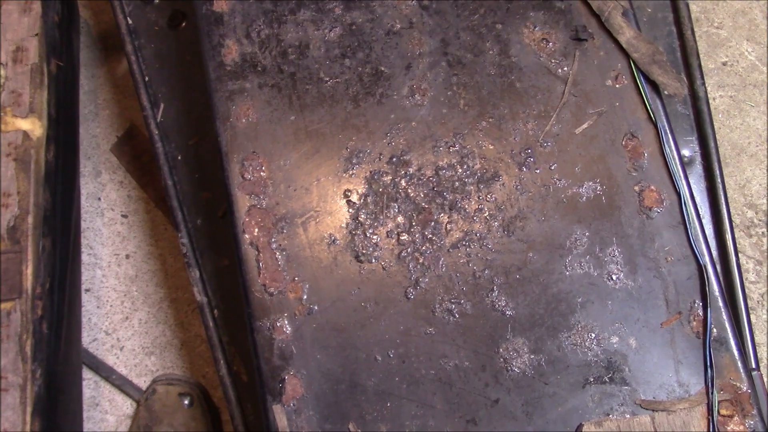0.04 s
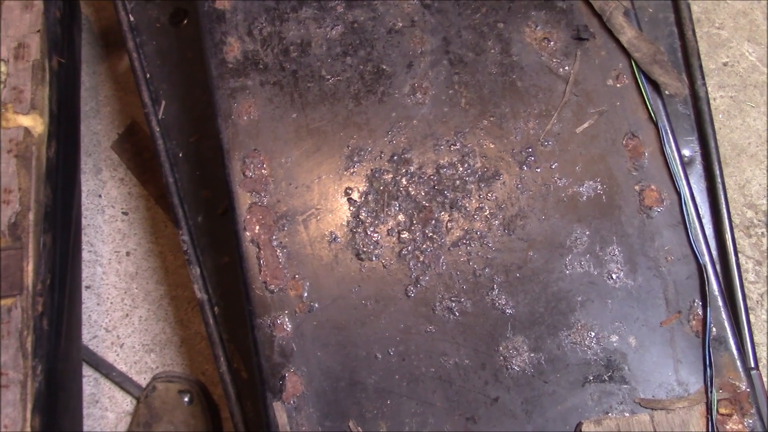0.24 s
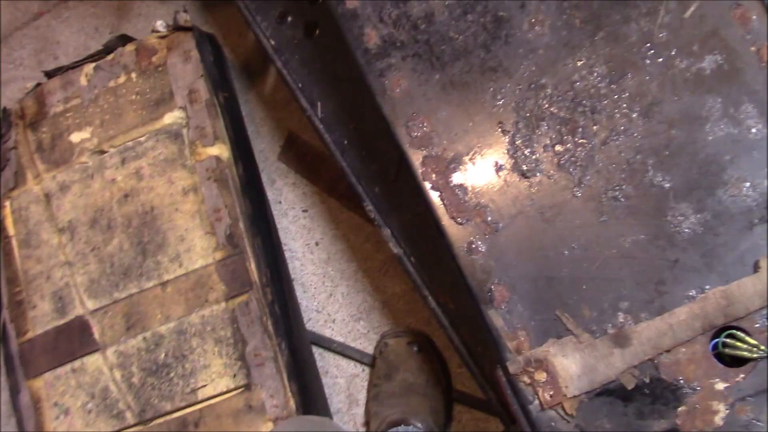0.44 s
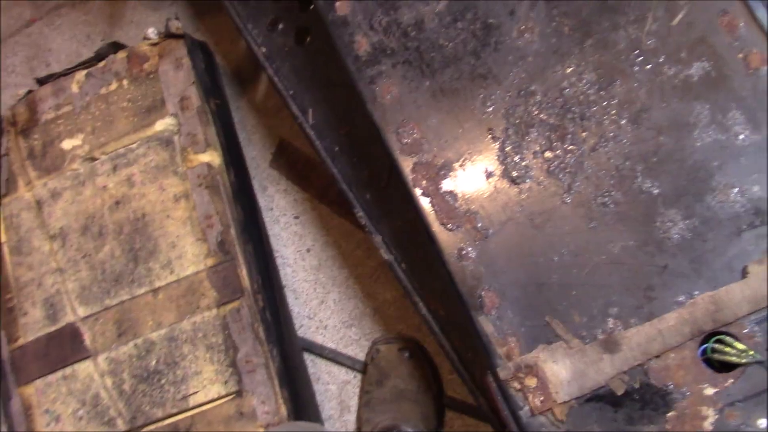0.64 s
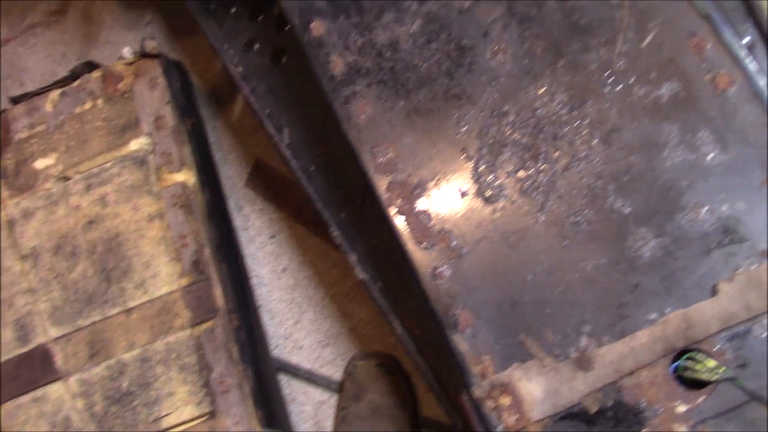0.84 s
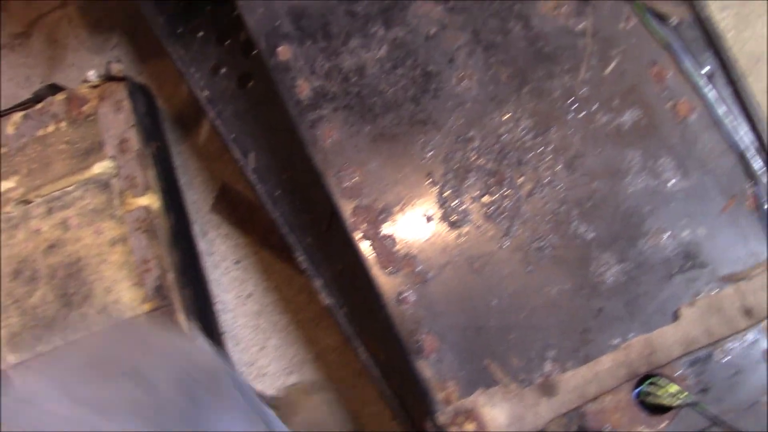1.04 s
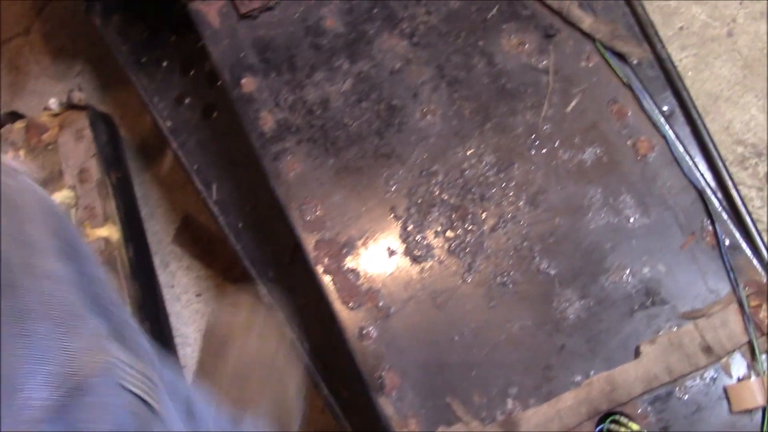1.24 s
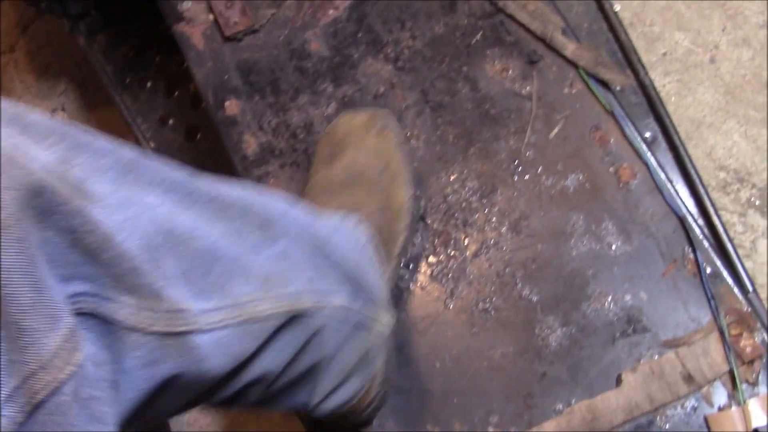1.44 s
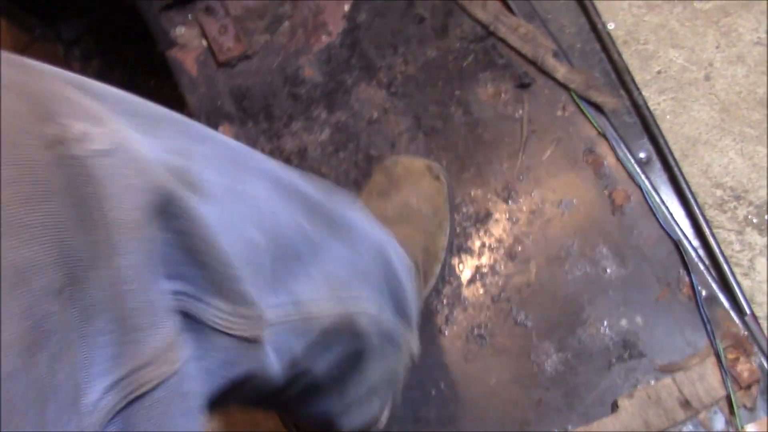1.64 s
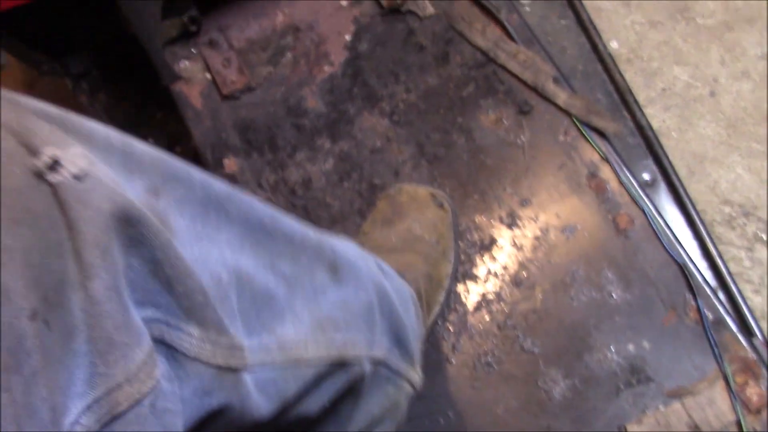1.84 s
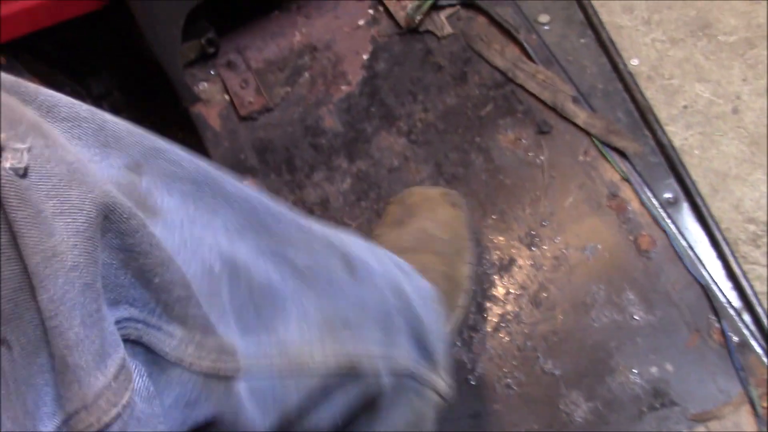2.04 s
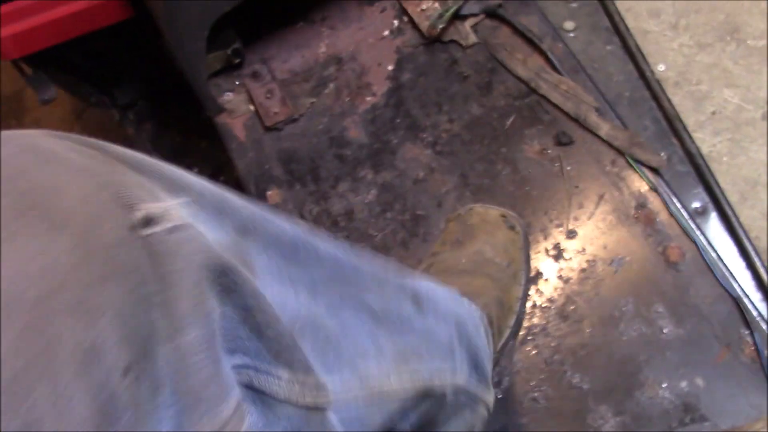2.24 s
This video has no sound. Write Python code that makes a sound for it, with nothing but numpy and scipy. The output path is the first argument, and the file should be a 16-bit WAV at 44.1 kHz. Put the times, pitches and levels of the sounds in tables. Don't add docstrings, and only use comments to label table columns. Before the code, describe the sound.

Two loud hollow metal booms as a boot stomps a loose rusty steel panel, flakes rattling.

```python
import sys
import numpy as np
from scipy import signal
from scipy.fft import rfft, irfft, next_fast_len
from scipy.io import wavfile

SR = 44100
rng = np.random.default_rng(int(sys.argv[2]) if len(sys.argv) > 2 else 0)


def unload_audio(sound):
    columns = np.transpose(np.atleast_2d(sound))
    steps = np.round(np.clip(columns, -1, 1) * 32767)
    wavfile.write(sys.argv[1], SR, steps.astype(np.int16))


def invert_db(level):
    return 10 ** (np.asarray(level, dtype=float) / 20)


N = 100503


def rms_one(x):
    return x / np.sqrt(np.mean(x ** 2) + 1e-20)


def in_time(rows):
    s, db = np.transpose(rows)
    return invert_db(np.interp(np.arange(N) / SR, s, db, right=-140))


def at_hz(points, hz):
    table_hz, value = np.transpose(points)
    return np.interp(np.log(hz), np.log(table_hz), value)


def drift(rate_hz):
    r = np.exp(-2 * np.pi * rate_hz * 40 / SR)
    slow = signal.lfilter([1], [1, -2 * r, r * r], rng.standard_normal(N // 40 + 2002))[2000:]
    return np.interp(np.arange(N) / 40, np.arange(len(slow)), rms_one(slow))


def banded(spectrum, patchy_db, white):
    shared_flicker = 0.6
    out, together = 0, drift(11.0)
    edges = 25 * 2 ** np.arange(0, 9.6, .5)
    for k, (low, high) in enumerate(zip(edges, edges[1:])):
        flicker = shared_flicker * together + drift(9.6)
        gain = invert_db(at_hz(spectrum, np.sqrt(low * high)) + patchy_db * flicker)
        if spectrum[0][0] <= high and low <= spectrum[-1][0]:
            band = signal.butter(2, [low, high], "band", fs=SR, output="sos")
            out = out + gain * signal.sosfilt(band, white[k % 2])
    return rms_one(out)


def add(out, s, sound):
    i = int(s * SR)
    out[i:i + len(sound)] += sound[:len(out) - i]


def panel():
    # start_s, strength_db, hardness_hz, favoured_hz
    contacts = [(0.951, -48, 350, 300), (1.5495, -3.5, 3300, 670), (1.585, -15, 1570, 496),
                (1.603, -9.5, 1530, 830), (1.6308, -18.5, 3970, 1500), (1.705, -57, 1030, 400),
                (1.866, -40, 4860, 1000), (1.89, -36.5, 1520, 403), (1.907, -30, 900, 363),
                (1.965, -58, 800, 300), (2.009, -40.5, 807, 248), (2.064, 2, 1870, 540),
                (2.101, -9, 2630, 576), (2.13, -9.5, 490, 397), (2.1535, -15, 6140, 2720),
                (2.19, -23, 4980, 300), (2.2411, -25, 6000, 2520), (2.26, -23, 794, 550)]
    # pitch_hz, level_db, t60_s
    strong_modes = [(174.35, -11, 0.51), (259.3, -3.5, 0.22), (288, -9, 0.15), (305, -2.5, 0.13),
                    (356, -8.5, 0.1), (393, -20, 0.13), (471, -2.5, 0.14), (505.7, -6, 0.13),
                    (560.5, -7.5, 0.07), (646.3, -24.5, 0.14), (860.8, -8, 0.19), (950, -21, 0.27),
                    (1054, -15.5, 0.18), (729, -36, 0.96)]
    # pitch_hz, level_db
    dense_levels = [(110, -25), (200, -17.5), (400, -18.5), (1000, -16), (2000, -17.5), (4000, -25),
                    (8000, -23), (15000, -78)]
    # pitch_hz, t60_s
    dense_t60 = [(110, 0.37), (400, 0.24), (1300, 0.15), (5000, 0.091), (15000, 0.059)]
    mode_db, scatter_db, rise_s = -13, 1.5, 0.00031
    favour_db, favour_octaves = 4.5, 0.83
    push_db, push_s = -14.5, 0.0091
    crack_db, crack_s = -10.5, 0.003

    t, out = np.arange(2 * SR // 5) / SR, np.zeros(N)
    dense_hz = np.sort(110 * (15500 / 110) ** rng.random(360) ** .8)
    dense_modes = [dense_hz, at_hz(dense_levels, dense_hz), at_hz(dense_t60, dense_hz)]
    hz, db, t60 = np.hstack([np.transpose(strong_modes), dense_modes])
    decay = invert_db(db[:, None] - 60 * t / t60[:, None])
    rings = np.sin(2 * np.pi * hz[:, None] * t) * decay * (1 - np.exp(-t / rise_s))
    push = invert_db(push_db) * t / push_s * np.exp(1 - t / push_s)
    for s, hit_db, hard_hz, favour_hz in contacts:
        size, side = rng.standard_normal((2, len(hz)))
        favour = favour_db * np.exp(-(np.log2(hz / favour_hz) / favour_octaves) ** 2)
        polarity = np.where(side > -.5, 1, -1)
        softness = 1 / (1 + (hz / hard_hz) ** 2)
        share = invert_db(mode_db + scatter_db * size + favour) * polarity * softness
        soft = signal.butter(3, min(hard_hz, .45 * SR), fs=SR, output="sos")
        burst = rng.standard_normal(len(t)) * np.exp(-t / crack_s)
        crack = invert_db(crack_db) * signal.sosfilt(soft, burst)
        add(out, s, invert_db(hit_db) * (share @ rings + push + crack))
    return out


def blooms():
    # start_s, peak_db, pitch_hz,
    # swell_s
    bloom_events = [(0.14, -66, 1487, .04), (0.27, -60, 1523, 0.026), (1, -51, 244, .012),
                    (1.549, -18, 305, 0.0076), (1.55, -31.5, 496, .008), (1.551, -32, 650, 0.005),
                    (1.552, -30, 147, 0.0088), (1.553, -20.5, 1292, 0.0085), (1.57, -22, 720, 0.0092),
                    (1.577, -14, 256.4, 0.018), (1.585, -24.5, 1150, 0.011), (1.59, -18.5, 357, 0.013),
                    (1.592, -19, 855, 0.0098), (1.6, -45, 108, 0.056), (1.61, -28, 179.5, 0.025),
                    (1.625, -26, 380.4, 0.011), (1.65, -24.5, 266, 0.016), (1.655, -25.5, 340, 0.01),
                    (1.67, -49, 772, 0.0097), (1.69, -50.5, 714, 0.053), (1.7, -49, 516, 0.014),
                    (1.735, -39, 281, 0.014), (1.87, -44.5, 168.6, 0.027), (1.9, -32, 344, 0.012),
                    (1.96, -41.5, 289, 0.017), (1.97, -50, 164, 0.023), (2.064, -13.5, 476, 0.0092),
                    (2.0642, -9.5, 241, 0.0092), (2.0644, -17.5, 890, 0.0061),
                    (2.0646, -15.5, 153.3, 0.015), (2.066, -13.5, 576.3, 0.0087), (2.087, -22, 642, 0.012),
                    (2.086, -25.5, 1085, 0.01), (2.095, -30.5, 1200, 0.012), (2.105, -21.5, 513, 0.012),
                    (2.115, -13.5, 257, .016), (2.14, -20, 175.2, 0.024), (2.145, -25, 937, 0.0067),
                    (2.149, -15.5, 283.7, .013), (2.187, -21, 255.2, 0.018), (2.19, -39.5, 649, .015),
                    (2.215, -34.5, 485, 0.012), (2.23, -39, 180, 0.022), (2.245, -29, 271, 0.014),
                    (2.245, -34.5, 536, 0.0099)]
    twin_ratio, twin_db = 1.07, -10.5
    t, out = np.arange(SR // 3) / SR, np.zeros(N)
    for s, db, hz, swell_s in bloom_events:
        main = np.sin(2 * np.pi * hz * t)
        twin = invert_db(twin_db) * np.sin(2 * np.pi * hz * twin_ratio * t)
        swell = invert_db(db) * t / swell_s * np.exp(1 - t / swell_s)
        add(out, s, swell * (main + twin))
    return out


def flakes(motion):
    # pitch_hz, density_db (per Hz)
    flake_colour = [(500, 7.5), (1500, 5.5), (3000, -3), (5000, -16), (6800, -16.5), (10000, -31),
                    (13000, -27), (15500, -41)]
    shake_db, follow_s, shake_power = -16, 0.007, 0.84
    r = np.exp(-1 / (follow_s * SR))
    shake = signal.lfilter([1 - r], [1, -r], motion ** 2) ** (shake_power / 2)
    return invert_db(shake_db) * shake * banded(flake_colour, 1.0, rng.standard_normal((2, N)))


def ticks():
    # start_s, peak_db, ring_hz, t60_s
    tick_events = [(1.5495, -36, 7000, .009), (1.588, -57, 12200, .031), (1.593, -56.5, 10700, .035),
                   (1.596, -46, 4100, .03), (1.614, -58, 12000, .007), (1.632, -51, 6800, .044),
                   (1.633, -58, 12250, .035), (1.637, -62, 13300, .025), (1.6885, -63, 11500, .009),
                   (1.752, -63, 10000, .008), (1.8106, -51, 2080, .011), (1.82, -60, 6500, .008),
                   (1.845, -62, 8000, .007), (1.868, -56, 3440, .017), (1.869, -57, 7000, .017),
                   (1.941, -59, 5460, .01), (1.9725, -55, 10600, .03), (1.9745, -61, 12800, .016),
                   (2.0174, -46, 6400, .008), (2.0875, -47, 10700, .07), (2.0885, -54, 12500, .045),
                   (2.104, -46, 6800, .045), (2.117, -57, 12600, .035), (2.141, -56, 10700, .06),
                   (2.1538, -22, 3430, .013), (2.155, -48, 12600, .011), (2.156, -41, 8500, .009),
                   (2.165, -44, 6800, .035), (2.189, -43, 6200, .011), (2.19, -49, 10600, .009),
                   (2.194, -42, 6200, .014), (2.193, -54, 9700, .03), (2.2325, -43, 5900, .014),
                   (2.2365, -45, 5900, .014), (2.2412, -29, 2800, .012), (2.242, -45, 7000, .009),
                   (2.243, -52, 9400, .031), (2.243, -56, 12800, .014), (2.245, -34, 2600, .014)]
    rise_share = 0.02
    least_spread_hz, spread_per_s = 120, 0.074
    t, out = np.arange(SR // 10) / SR, np.zeros(N)
    for s, db, hz, t60 in tick_events:
        detune, phase = rng.random((2, 10, 1))
        swell = invert_db(db - 60 * t / t60) * (1 - np.exp(-t / (rise_share * t60)))
        spread = (np.arange(10)[:, None] + detune - 5) / 3
        mode_hz = hz + (least_spread_hz + spread_per_s / t60 ** 2) * spread
        add(out, s, swell * np.sin(2 * np.pi * (mode_hz * t + phase)).sum(0) / 2)
    return out


def grind():
    # start_s, level_db
    grind_curve = [(1.54, -100), (1.64, -53.5), (1.8, -66), (1.864, -57.5), (1.868, -54), (1.92, -53),
                   (1.96, -49.5), (2.05, -52), (2.2, -41), (2.28, -55)]
    # pitch_hz, density_db (per Hz)
    grit_colour = [(500, 11.5), (1000, 1.5), (2000, -4), (4000, -2), (7000, -10.5), (11000, -19),
                   (15500, -40)]
    grains_per_s, grain_spread_db = 2500, 2
    loudness = invert_db(grain_spread_db * np.minimum(rng.exponential(1, (2, N)), 5))
    sizes = loudness * rng.choice([-1, 1], (2, N))
    grains = sizes * (rng.random((2, N)) < grains_per_s / SR)
    return in_time(grind_curve) * banded(grit_colour, 3.6, grains + 1e-18)


def swish():
    # start_s, level_db
    swish_curve = [(0.55, -75), (0.608, -79), (0.692, -73.5), (1.018, -64.5), (1.136, -52), (1.256, -52.5),
                   (1.374, -65), (1.462, -69.5), (1.55, -61.5), (1.7, -83)]
    # pitch_hz, density_db (per Hz)
    denim_colour = [(530, -51), (900, 13), (967, -6), (1820, -2.5), (3110, -1.5), (4280, -10.5), (6500, -7),
                    (9180, -14), (15500, -42)]
    return in_time(swish_curve) * banded(denim_colour, 0.3, rng.standard_normal((2, N)))


def shop(x):
    echo_t60_s, wall_cut_hz = 0.33, 1750
    size = next_fast_len(N + SR)
    w = 2 * np.pi * np.arange(size // 2 + 1) / size
    dull = 1 / (1 + 1j * w * SR / (2 * np.pi * wall_cut_hz))
    echo = 0
    for k, lag_s in enumerate(rng.uniform(.015, .045, 10)):
        loop = invert_db(-60 * lag_s / echo_t60_s) * dull * np.exp(-1j * w * lag_s * SR)
        echo = echo + (-1) ** k * loop / (1 - loop)
    return irfft(rfft(x, size) * echo, size)[:N]


def shuffle():
    # pitch_hz, density_db (per Hz)
    shuffle_colour = [(300, -18), (700, 14.5), (1500, 8), (2200, -16), (4000, -36)]
    centre_s, half_s, level_db = 0.22, 0.1, -57
    swell = np.exp(-.5 * ((np.arange(N) / SR - centre_s) / half_s) ** 2)
    return invert_db(level_db) * swell * banded(shuffle_colour, 1.0, rng.standard_normal((2, N)))


def motor():
    # pitch_hz, width_hz, level_db
    hum_lines = [(110.6, 10, -69), (222, 12, -64), (333.6, 3.9, -59.5), (486, 7.8, -65.5), (654, 8, -84)]
    # start_s, level_db
    drone_curve = [(0, -59), (.2, -61), (.4, -59.5), (.484, -49.5), (.56, -74), (.64, -57), (.7, -81),
                   (.85, -62), (.96, -52.5), (1.06, -67), (1.15, -57.5), (1.28, -55.5), (1.35, -64),
                   (1.44, -63), (1.55, -59), (2.28, -49)]
    drone_hz = 223
    out = np.sqrt(2) * in_time(drone_curve) * np.sin(2 * np.pi * drone_hz * np.arange(N) / SR)
    for hz, width_hz, db in hum_lines:
        r = np.exp(-np.pi * width_hz / SR)
        poles = [1, -2 * r * np.cos(2 * np.pi * hz / SR), r * r]
        line = signal.lfilter([1, 0, -1], poles, rng.standard_normal(N + SR))[SR:]
        out += invert_db(db) * rms_one(line)
    return out


def room():
    # pitch_hz, density_db (per Hz)
    air_colour = [(25, -32), (60, -41), (120, -10), (250, 0.5), (600, -5), (1500, -18.5), (5000, -34),
                  (15500, -51)]
    return invert_db(-54) * banded(air_colour, 1.0, rng.standard_normal((2, N)))


def scene():
    mic_cut_hz, shop_db = 159.5, -18.5
    boom = panel()
    near = boom + blooms() + flakes(boom) + ticks() + grind()
    cut = signal.butter(2, mic_cut_hz, "high", fs=SR, output="sos")
    near = signal.sosfilt(cut, near)
    echo = invert_db(shop_db) * signal.sosfilt(cut, shop(near))
    background = shuffle() + motor() + room()
    return (near + echo + swish() + background)[None]


def top_cut(x):
    return signal.sosfilt(signal.butter(12, 15690, fs=SR, output="sos"), x)


def record(dry):
    ceiling_db, release_db_per_s, attack_s = -6, 223, 0.00094
    fall = release_db_per_s * np.arange(N) / SR
    over = np.maximum(20 * np.log10(np.abs(dry[0]) + 1e-9) - ceiling_db, 0)
    held = np.maximum.accumulate(over + fall) - fall
    r = np.exp(-1 / (attack_s * SR))
    limited = dry * invert_db(-signal.lfilter([1 - r], [1, -r], held))
    return top_cut(0.55 * np.tanh(limited / 0.51))


dry = scene()
out = record(dry)
unload_audio(out)
```